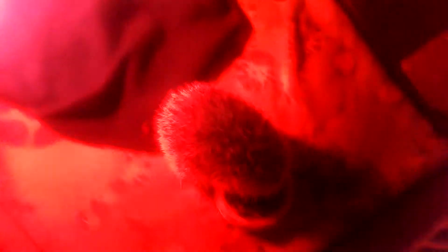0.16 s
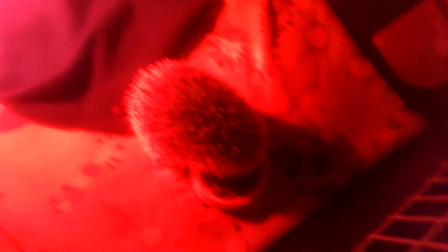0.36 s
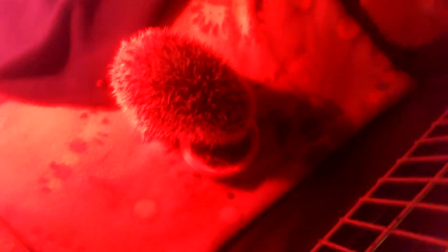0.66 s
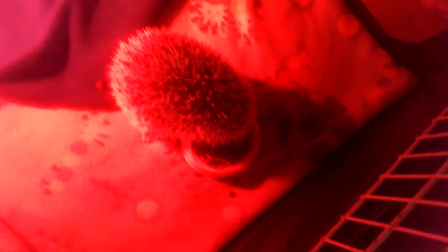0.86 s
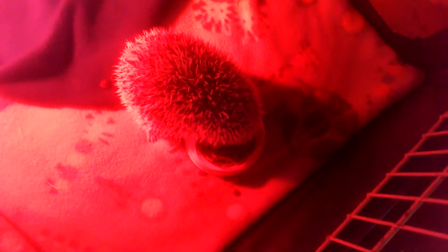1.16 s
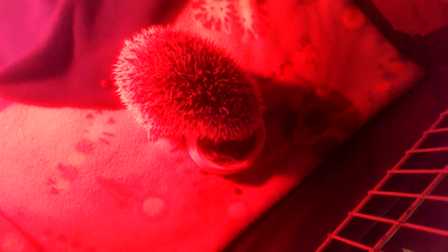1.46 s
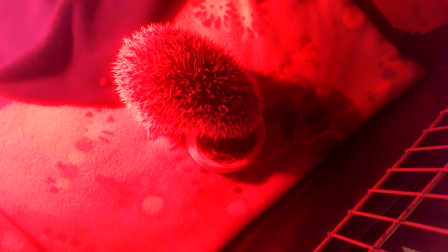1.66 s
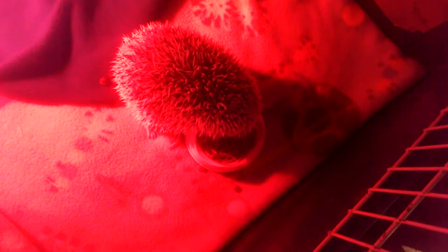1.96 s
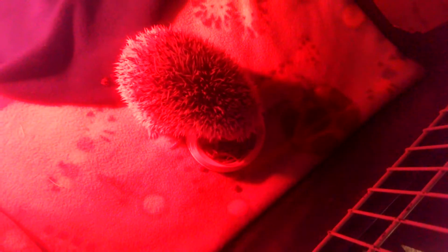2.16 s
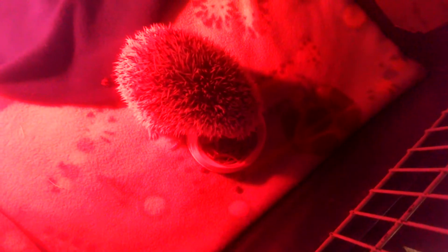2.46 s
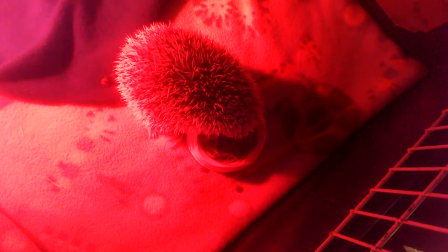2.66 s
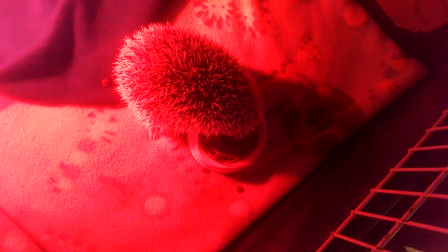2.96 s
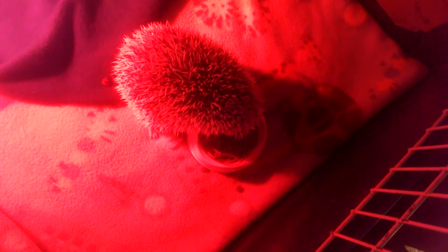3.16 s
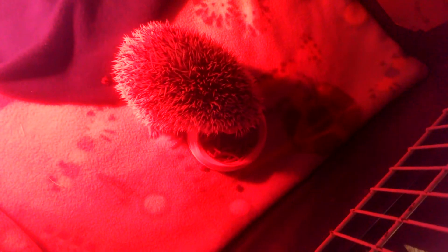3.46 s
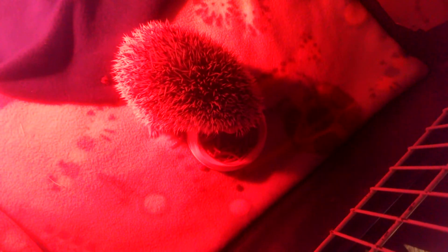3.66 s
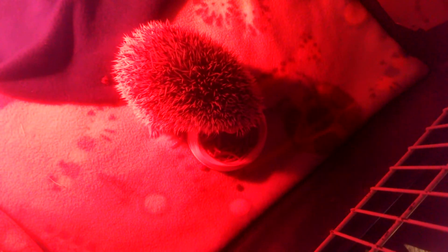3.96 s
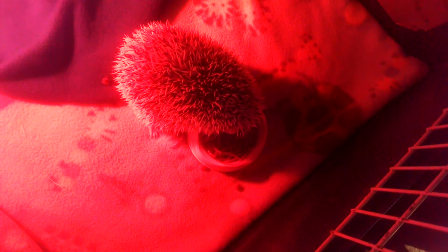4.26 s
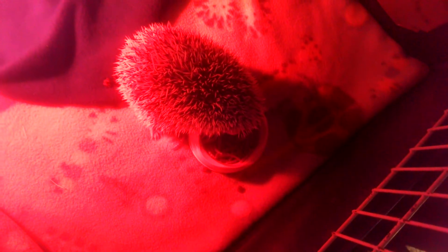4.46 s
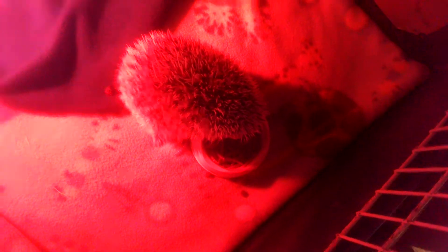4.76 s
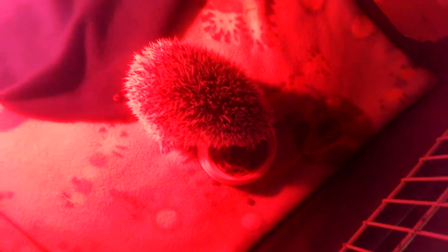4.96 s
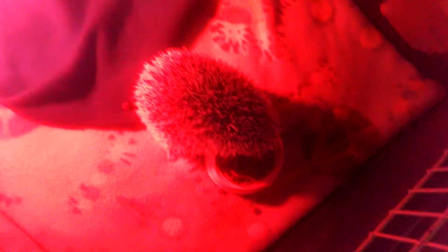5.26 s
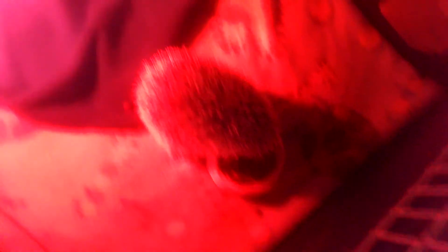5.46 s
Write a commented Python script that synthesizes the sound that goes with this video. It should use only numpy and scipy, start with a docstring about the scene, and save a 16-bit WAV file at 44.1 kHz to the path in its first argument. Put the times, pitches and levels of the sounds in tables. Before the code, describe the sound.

A small hedgehog eats brittle insects from a bowl in a padded indoor cage, heard by a handheld camera with a slightly hollow, wide stereo sound. From 0 to 1.2 s the hand rubs dryly over the case, with a click near 0.2 s, firm bumps at 0.25 s and further dull knocks around 0.8-1.05 s. Softer thumps follow until about 2.2 s. Chewing starts at 2.0 s with light ticks, then a quick crackling crunch at 2.26-2.37 s. More snaps come at 2.83-3.05 s, a sharp cluster at 3.17-3.22 s, thinner ticks to 3.63 s and the strongest crisp crack near 3.8 s. After a pause, weaker crunches come at 4.5-4.62 s. A tiny creak at 4.84 s leads into a click and rubbing, with bumps and a brighter click around 5.3-5.5 s. Low uneven rumble and faint steady hiss continue throughout.

```python
"""A hedgehog chews mealworms at a bowl on a fleece cage liner: noise snaps that die within milliseconds over crackle.
The snaps and the crackle set the bowl ringing faintly, and the padded cage adds a short tail.
The hand that holds the camera slides, ticks and bumps on its resonant case, and something creaks once.
The quiet room is shaped noise: a low, slowly changing rumble under a steady hiss.
Two closely spaced microphone ports pick it all up, and stereo widening combs them."""
import sys
import numpy as np
from scipy import signal
from scipy.fft import rfft, irfft
from scipy.io import wavfile

SR = 44100
rng = np.random.default_rng(int(sys.argv[2]) if len(sys.argv) > 2 else 0)


def int16_out(signal):
    """Quantize to a 16-bit WAV file."""
    q = np.round(np.clip(np.atleast_2d(signal).T, -1, 1) * 32767)
    wavfile.write(sys.argv[1], SR, q.astype(np.int16))


N = 246959
TIME = np.arange(N) / SR   # [s]

# All table levels are relative; the layers trim them further.
# rumble of the room and the holding hand: (time [s], level [dB])
STIR_LEVELS = [(0.0, -58), (1.2, -50), (1.31, -56), (1.92, -60), (3.68, -60), (4.91, -54.5), (5.16, -57),
               (5.6, -50.5)]
# colour of the room air: (frequency [Hz], spectral density [dB])
ROOM_COLOUR = [(25, -3.5), (52, 7), (80, 2), (120, 6.5), (150, -2), (185, 3), (240, -5.5), (330, -3.5),
               (600, -16), (1200, -26), (3000, -25), (8000, -25.5), (13000, -22), (16000, -22)]
# skin sliding on the case: (start [s], length [s], rumble level [dB], hiss level [dB])
SLIDES = [(0, 0.18, -39.5, -37.5), (0.103, 0.034, -37, -31), (0.238, 0.027, -46.5, -46.5),
          (0.28, 0.064, -53, -59.5), (0.362, 0.28, -42, -49.5), (0.66, 0.33, -48.5, -53.5),
          (0.876, 0.042, -51, -48), (0.931, 0.12, -43, -40), (1.048, 0.15, -41.5, -38.5),
          (1.63, 0.05, -58, -81), (4.29, 0.28, -60.5, -58.5), (4.892, 0.0058, -37, -41),
          (5.008, 0.037, -41, -49.5), (5.33, 0.24, -48, -52), (5.401, 0.057, -41, -43.5)]
# colour of the sliding skin's rumble: (frequency [Hz], spectral density [dB])
RUMBLE_COLOUR = [(30, -8), (60, 3), (150, 3), (300, 2), (600, 0.5), (1000, -5.5), (1600, -16),
                 (3300, -13.5), (6000, -17), (15000, -51)]
# colour of its dry hiss: (frequency [Hz], spectral density [dB])
HISS_COLOUR = [(600, -25), (1000, 0.5), (1500, -3.5), (2200, -1), (3100, 3), (4200, -8), (5200, -4.5),
               (8000, -1.5), (12000, 0.5), (14500, -1.5), (16000, -11.5)]
# fingers bumping the case, and the late dull slips of the creak near 4.85-4.87 s:
# (time [s], strength [dB], pitch of the excited spot [Hz], weight [dB], dull above [Hz])
KNOCKS = [(0.082, -28, 400, -10, 1500), (0.1974, -21, 300, 7, 1500), (0.2421, -8.5, 574, 0.5, 6000),
          (0.2455, -5, 278, 0.5, 6000), (0.2908, -29.5, 350, -9, 1500), (0.8275, -18.5, 524, 11, 1300),
          (.940, -21.5, 230, -4, 450), (0.9462, -23, 240, -1, 450), (.951, -23, 740, 1, 1000),
          (1.051, -26.5, 240, -7, 700), (1.233, -22.5, 332, 8, 900), (1.298, -26, 420, 9.5, 900),
          (1.341, -33, 475, 5, 900), (1.353, -23.5, 180, 11, 500), (1.465, -30.5, 300, 6, 600),
          (1.529, -26, 430, 10, 800), (1.622, -34, 400, -8, 900), (1.634, -37, 650, -3, 900),
          (1.70, -36, 358, -4, 450), (2, -33, 450, 10, 800), (2.065, -36, 150, 0, 350),
          (2.144, -33.5, 190, 4, 400), (2.21, -42, 150, 6, 350), (3.648, -32.5, 620, 9, 950),
          (3.749, -31.5, 200, 4, 500), (4.1474, -24, 400, -1, 800), (4.513, -32.5, 330, -3, 600),
          (4.562, -33.5, 220, -2, 450), (4.652, -33, 200, -2, 450), (4.813, -27.5, 163, -4, 300),
          (4.849, -26.5, 520, -13, 1000), (4.8531, -24.5, 350, -1, 700), (4.8613, -25.5, 450, -6, 800),
          (4.8743, -31, 480, -8, 800), (4.884, -18.5, 825, -7, 1330), (5.187, -33, 260, 8, 600),
          (5.322, -18.5, 407, -4.5, 800), (5.338, -19, 410, -2.5, 810), (5.348, -29, 260, -9, 500),
          (5.367, -30, 480, -3, 800), (5.385, -26, 350, -2, 800), (5.4056, -15.5, 586, -1.5, 2200),
          (5.481, -20.5, 110, 9, 400), (5.5027, -28, 675, 4, 1200)]
# resonances of the case: (frequency [Hz], level [dB], time to fall 60 dB [s])
CASE_MODES = [(54.8, -10, 0.15), (101.5, -4.5, 0.069), (177.5, -8, 0.07), (273, -1, 0.032),
              (351, -4, 0.024), (619, -9.5, 0.032), (870, 7.5, 0.0022), (2110, 15, 0.0064),
              (2800, 20.5, 0.014), (7000, -25, 0.0065)]
# hard clicks of the case under the fingers: (time [s], level [dB])
CASE_CLICKS = [(0.1963, -17.5), (0.2452, -26), (4.8845, -21.5), (5.4049, -21.5)]
# shell snaps: (time [s], strength [dB], body relative to the strength [dB])
SNAPS = [(1.9995, -21.5, -33), (2.006, -25, -28), (2.009, -15, -33), (2.0237, -18, -38), (2.0405, -28, -22),
         (2.131, -19, -25), (2.135, -26.5, -7.5), (2.2614, -21, -22), (2.265, -28, -13), (2.2745, -32, -8),
         (2.2875, -11, -22), (2.291, -22, -9), (2.2996, -16, -17), (2.3033, -24, -20.0),
         (2.3176, -20.5, -8.5), (2.3236, -23, -8.5), (2.342, -25.5, -5), (2.3513, -32, -16.0),
         (2.3587, -27, -5.5), (2.37, -30, -16), (2.4405, -38, 0.5), (2.829, -28, -7), (2.862, -14, -18),
         (2.866, -22, -9.5), (2.8696, -19, -12), (2.873, -19.0, -26), (2.879, -25.0, -13.5),
         (2.9518, -15, -18.5), (2.9663, -21.5, -11.5), (3.014, -15, -20.5), (3.041, -21.5, -8),
         (3.049, -23, -1), (3.1662, -26, -16), (3.1755, -14, -14), (3.1786, -28, -11), (3.1897, -7, -19),
         (3.1936, -9.5, -21), (3.197, -20, 0), (3.216, -13.0, -15.5), (3.221, -13.5, -22), (3.35, -28, -24),
         (3.363, -15, -30), (3.375, -15, -27), (3.391, -19, -22), (3.3958, -19.5, -18), (3.52, -29, -28),
         (3.569, -20, -38), (3.632, -23.5, -33), (3.7675, -13, -19), (3.7748, -14.5, -22),
         (3.784, -17, -25), (3.7888, -19, -23), (3.7916, -12.5, -18), (3.795, -2, -25.5), (3.7966, -6, -29),
         (3.7998, -9.5, -23.5), (3.804, -16, -22), (4.494, -25, -15), (4.5058, -25, -7.5),
         (4.5175, -24, -6.5), (4.5515, -30, -22), (4.5593, -21.5, -16), (4.6135, -18, -26),
         (4.6213, -19, -19)]
# bites, the teeth crushing between snaps: (start [s], length [s], crackle level [dB])
BITES = [(2.13, 0.032, -51), (2.262, 0.11, -42), (2.288, 0.036, -37.5), (2.84, 0.17, -45),
         (2.866, 0.023, -36), (3.0, 0.12, -49), (3.172, 0.054, -38), (3.37, 0.031, -44), (3.77, 0.047, -44),
         (4.487, 0.03, -40), (4.605, 0.039, -44.5)]
# resonances of the bowl: (frequency [Hz], level [dB], time to fall 60 dB [s])
BOWL_MODES = [(1910, -11, 0.03), (3130, -8, 0.043), (3660, 10.5, 0.071), (7200, -7, 0.016),
              (10800, 23, 0.016), (11300, 2, 0.016), (14100, 11, 0.013)]
# colour of breaking shell: (frequency [Hz], spectral density [dB])
SHELL_COLOUR = [(500, -3), (1000, 2.5), (1300, 2), (1900, 6), (2600, 6), (3400, 3), (4200, 4), (5400, 1.5),
                (6800, 3.5), (8500, 1), (10000, -2.5), (11200, 6.5), (12800, 2), (14300, 4.5), (15000, 1),
                (16000, -11)]
# resonances of the creak: (frequency [Hz], level [dB], time to fall 60 dB [s])
CREAK_MODES = [(192, -4, 0.035), (338, 5, 0.034), (437, 2, 0.036), (565, 3.5, 0.029), (780, -4, .018),
               (970, 1, 0.012), (1490, -1, 0.0064), (2050, -9, 0.0076)]

SLIDE_ATTACK_S, SLIDE_RELEASE_S = 0.029, 0.039   # time to swell and to fade by 20 dB
CONTACT_CYCLES = 1.86   # the excited spot falls 60 dB in this many cycles
SETTLE_LAG_S, SETTLE_HZ, SETTLE_T60_S = 0.0039, 97, 0.042   # the case settles just after a knock
CLICK_T60_S = 0.0087
SNAP_RISE_S, SNAP_T60_S = 0.00097, 0.011   # a crack gathers speed, then dies
BITE_ATTACK_S, BITE_RELEASE_S = 0.036, 0.021   # time to swell and to fade by 20 dB
CAGE_DB, CAGE_T60_S = -17, 0.12   # tail of the padded cage
CREAK_START_S, CREAK_LENGTH_S = 4.839, 0.008
CREAK_ATTACK_S, CREAK_RELEASE_S = 0.0023, 0.052   # time to swell and to fade by 20 dB
# the slips slow down as the strain eases; rates before jitter
FIRST_SLIPS_PER_S, LAST_SLIPS_PER_S, SLOWING_S = 830, 210, 0.008
CREAK_DULLING_DB_PER_S, CREAK_DULL_ABOVE_HZ = 330, 410   # per octave above this
PORT_GAP_S, COPY_SMEAR = 0.000389, 0.07   # delay and dulling of the combing copy
BASS_KEPT_DB, BASS_KEPT_BELOW_HZ = -11.5, 284   # plain bass left in the middle
CUTOFF_HZ = 15600


def from_db(db):
    """Decibels to gain."""
    return 10 ** (np.asarray(db) / 20)


def rms_one(x):
    """Scale to rms 1."""
    return x / np.sqrt(np.mean(x ** 2) + 1e-20)


def cut(x, hz, kind="low", order=2):
    """Butterworth low- or high-pass."""
    sos = signal.butter(order, min(hz, .45 * SR), kind, fs=SR, output="sos")
    return signal.sosfilt(sos, x + 1e-18)


def colour(x, points):
    """Causal (minimum-phase) filter with the given spectrum and unit power gain."""
    hz, db = np.transpose(points)
    grid = np.linspace(1, SR / 2, 4097)
    gain = rms_one(from_db(np.interp(np.log(grid), np.log(hz), db)))
    # folding the cepstrum makes the filter minimum-phase
    cepstrum = irfft(np.log(gain))
    cepstrum[1:len(grid) - 1] *= 2
    cepstrum[len(grid):] = 0
    response = irfft(np.exp(rfft(cepstrum)))
    return signal.fftconvolve(x, response[None], axes=1)[:, :N]


def drift(hz):
    """Slow random wander of rms 1: noise low-passed at hz."""
    return rms_one(cut(rng.standard_normal(N + SR), hz)[SR:])


def ring(clicks, hz, t60):
    """A damped resonator: a unit click starts a decaying sine of starting height 1."""
    r, w = from_db(-60 / (t60 * SR)), 2 * np.pi * hz / SR
    return signal.lfilter([0, np.sin(w)], [1, -2 * r * np.cos(w), r * r], clicks + 1e-18)


def port_noise(shared):
    """White noise at the two ports; shared is the part of its power common to both."""
    shared = np.clip(shared, 0, 1)
    own = np.sqrt(1 - shared) * rng.standard_normal((2, N))
    return own + np.sqrt(shared) * rng.standard_normal(N)


def swells(rows, attack_s, release_s):
    """Gain that swells, holds and fades for each (start [s], length [s], level [dB])."""
    power = np.zeros(N)
    for start, length, db in rows:
        before = np.maximum((start - TIME) / attack_s, 0)
        after = np.maximum((TIME - start - length) / release_s, 0)
        power += from_db(db - 20 * np.minimum(before + after, 10)) ** 2
    return np.sqrt(power)


def room(hiss_db, stir_db, waver_db):
    """Steady faint hiss over a low, slowly changing rumble, both from one coloured noise."""
    air = colour(port_noise(0.26), ROOM_COLOUR)
    stir = from_db(np.interp(TIME, *np.transpose(STIR_LEVELS)) + stir_db + waver_db * drift(10.6))
    rumble = stir * cut(air, 854)
    hiss = from_db(hiss_db) * cut(air, 865, "high")
    return (rumble - hiss) * from_db([[-5], [0]])


def rubbing(rumble_db, hiss_db, rough_db, left_db, hiss_left_db):
    """Skin catches and slides: an uneven rumble with a dry hiss on top."""
    catch = from_db(rough_db * drift(60))
    pressing = swells([(s, length, db) for s, length, db, _ in SLIDES], SLIDE_ATTACK_S, SLIDE_RELEASE_S)
    sliding = swells([(s, length, db) for s, length, _, db in SLIDES], SLIDE_ATTACK_S, SLIDE_RELEASE_S)
    rumble = from_db(rumble_db) * pressing * colour(port_noise(0.066) * catch, RUMBLE_COLOUR)
    hiss = from_db(hiss_db) * sliding * colour(port_noise(0.052) * catch, HISS_COLOUR)
    return rumble * from_db([[left_db], [0]]) + hiss * from_db([[hiss_left_db], [0]])


def grip_ticks(per_s, db, soft_hz):
    """The grip keeps shifting: tiny dull ticks ring the case at the right port, stronger as the hand stirs."""
    touches = (rng.random(N) < per_s / SR) * rng.uniform(-1.06, 1, N)
    ringing = sum(from_db(mode_db) * ring(touches, hz, t60) for hz, mode_db, t60 in CASE_MODES)
    ticks = rms_one(cut(ringing, soft_hz))
    stir = from_db(db + np.interp(TIME, *np.transpose(STIR_LEVELS)))
    return stir * ticks * np.array([[0], [1]])


def case_knocks(db, left_db, vary_db, bass_hz, settle_db):
    """Finger bumps and late creak slips ring the case, mostly at the right port; weight adds a low late thud."""
    out, t = np.zeros(N + SR), TIME[:SR // 5]
    late = np.maximum(t - SETTLE_LAG_S, 0)
    settle = rms_one(np.sin(2 * np.pi * SETTLE_HZ * late) * from_db(-60 * late / SETTLE_T60_S))
    click = signal.unit_impulse(len(t))
    for start, knock_db, spot_hz, weight_db, soft_hz in KNOCKS:
        push = np.diff(ring(click, spot_hz, CONTACT_CYCLES / spot_hz), prepend=0)
        ringing = np.zeros(len(t))
        for hz, mode_db, t60 in CASE_MODES:
            # weight only moves the lowest modes
            level_db = mode_db + weight_db * (hz < bass_hz) + vary_db * rng.normal()
            ringing += from_db(level_db) * ring(push, hz, t60) / hz
        knock = rms_one(cut(ringing, soft_hz)) + from_db(settle_db + weight_db) * settle
        at = round(start * SR)
        out[at:at + len(t)] += from_db(knock_db + db) * knock
    return np.array([from_db(left_db) * out[:N], out[:N]])


def case_clicks(low_hz, left_db):
    """The case gives under the fingers with a short bright crack of decaying noise."""
    gain = np.zeros(N)
    for start, db in CASE_CLICKS:
        fall_db = 60 * np.clip((TIME - start) / CLICK_T60_S, 0, 3)
        gain += (TIME >= start) * from_db(db - fall_db)
    return cut(gain * port_noise(0.24), low_hz, "high") * from_db([[left_db], [0]])


def snaps(body_db, crisp_db, split_hz, jag_db, shared):
    """Each snap is a run of tiny fractures, dead in milliseconds; scattering in the bowl parts the ports."""
    body, crisp, t = np.zeros((2, N)), np.zeros((2, N)), TIME[:SR // 20]
    shape = np.minimum(t / SNAP_RISE_S, 1) ** 2 * from_db(-60 * t / SNAP_T60_S)
    fractures = port_noise(shared) * from_db(jag_db * rng.standard_normal(N))
    for start, strength_db, low_db in SNAPS:
        at = round(start * SR)
        span = slice(at, at + len(t))
        burst = shape * fractures[:, span]
        # strength sets the energy of the whole burst
        burst *= from_db(strength_db) / np.linalg.norm(burst, axis=1, keepdims=True)
        body[:, span] += from_db(low_db + body_db) * burst
        crisp[:, span] += from_db(crisp_db) * burst
    return cut(body, split_hz) - cut(crisp, split_hz, "high")


def crackle(per_s, spread_db, clump_db, grain_t60, db):
    """Clumps of fine grains while the teeth crush the shell, each a tiny dying burst."""
    grains = rng.random(N) < per_s / SR
    size_db = spread_db * np.minimum(rng.exponential(1, N), 3) + clump_db * drift(160)
    sizes = grains * from_db(size_db)
    power_decay = from_db(-60 / (grain_t60 * SR)) ** 2
    power = signal.lfilter([1], [1, -power_decay], sizes ** 2 + 1e-18)
    texture = rms_one(np.sqrt(power) * port_noise(0.59))
    return from_db(db) * swells(BITES, BITE_ATTACK_S, BITE_RELEASE_S) * texture


def bowl_ring(x, db):
    """The chewing sets the resonances of the bowl ringing faintly."""
    return x + sum(from_db(mode_db + db) * ring(x, hz, t60) for hz, mode_db, t60 in BOWL_MODES)


def from_bowl(x, lag_s):
    """Sound reaches the right port first; the padded cage adds a faint short tail."""
    t = TIME[:SR // 3]
    echoes = rng.standard_normal((2, len(t))) * from_db(-60 * t / CAGE_T60_S)
    echoes *= from_db(CAGE_DB) / np.linalg.norm(echoes, axis=1, keepdims=True)
    direct = np.array([np.interp(TIME - lag_s, TIME, x[0]), x[1]])
    return direct + signal.fftconvolve(x, echoes, axes=1)[:, :N]


def creak(jitter, db, low_hz):
    """A brief run of uneven slips that starts bright, then slows down and dulls."""
    age = np.maximum(TIME - CREAK_START_S, 0)
    per_s = LAST_SLIPS_PER_S + (FIRST_SLIPS_PER_S - LAST_SLIPS_PER_S) * np.exp(-age / SLOWING_S)
    turns = np.cumsum(per_s * np.exp(jitter * drift(250))) / SR
    # one slip at each whole turn
    slips = np.diff(np.floor(turns), prepend=0)
    slips *= swells([(CREAK_START_S, CREAK_LENGTH_S, db)], CREAK_ATTACK_S, CREAK_RELEASE_S)
    sound = np.zeros(N)
    for hz, mode_db, t60 in CREAK_MODES:
        octaves_above = max(np.log2(hz / CREAK_DULL_ABOVE_HZ), 0)
        level_db = mode_db - CREAK_DULLING_DB_PER_S * age * octaves_above
        sound += ring(slips * from_db(level_db), hz, t60)
    return cut(sound, low_hz, "high") * from_db([[-4], [0]])


def comb(x, share):
    """A copy delayed by the port gap cuts even notches; it is a little dull, so high ones stay shallow."""
    lag = round(PORT_GAP_S * SR)
    copy = np.zeros(lag + 2)
    copy[lag - 1:] = COPY_SMEAR, 1 - 2 * COPY_SMEAR, COPY_SMEAR
    return signal.lfilter(signal.unit_impulse(lag + 2) + np.clip(share, -1, 1) * copy, [1], x)


def widen(ports, sum_share, side_share):
    """Stereo widening combs the sum and the difference of the ports, which sounds hollow."""
    left, right = ports / 2
    bass = from_db(BASS_KEPT_DB) * cut(left + right, BASS_KEPT_BELOW_HZ, order=1)
    mid = comb(left + right, -sum_share) + bass
    side = comb(left - right, side_share)
    return np.array([mid + side, mid - side])


def scene():
    """The chewing comes through thin and fairly plain; handling noise and room air are deeply combed."""
    chewing = snaps(body_db=13.5, crisp_db=3.5, split_hz=9400, jag_db=2.5, shared=0.69)
    chewing += crackle(per_s=900, spread_db=1.5, clump_db=3.0, grain_t60=0.0034, db=-6)
    chewing = from_bowl(bowl_ring(chewing, db=-51.5), lag_s=0.00009)
    chewing = cut(colour(chewing, SHELL_COLOUR), 1330, "high", order=4)
    hedgehog = widen(chewing * from_db([[-2.5], [0]]), sum_share=0.17, side_share=0.43)

    case_noise = case_knocks(db=-19.0, left_db=-21.5, vary_db=3, bass_hz=140, settle_db=-15.5)
    case_noise += grip_ticks(per_s=16, db=-3, soft_hz=420)
    case_noise += rubbing(rumble_db=0.0, hiss_db=-0.5, rough_db=1.17, left_db=-4, hiss_left_db=-3.0)
    case_noise += creak(jitter=0.36, db=-38.5, low_hz=220)
    case_noise += case_clicks(low_hz=4170, left_db=-3.5)
    air = room(hiss_db=-48.5, stir_db=10.5, waver_db=2.5)
    return hedgehog + widen(case_noise + air, sum_share=0.81, side_share=0.67)


def record(dry):
    """A steep elliptic low-pass cuts the top."""
    return signal.sosfilt(signal.ellip(10, .3, 80, CUTOFF_HZ, fs=SR, output="sos"), dry)


dry = scene()
out = record(dry)
int16_out(out)
```